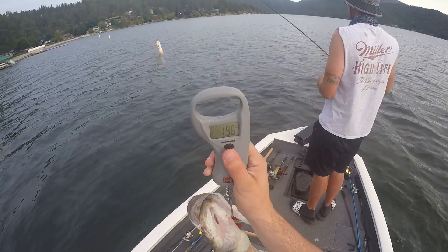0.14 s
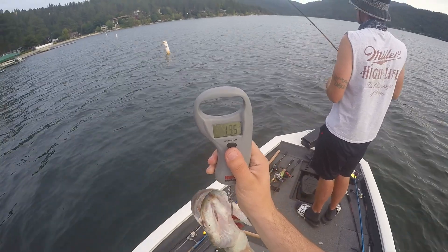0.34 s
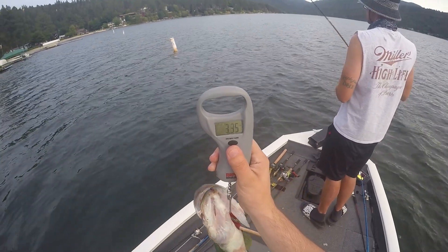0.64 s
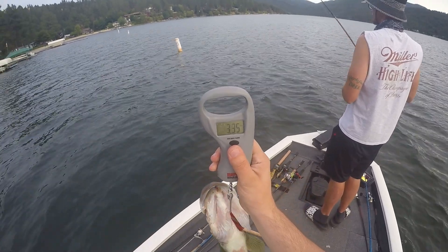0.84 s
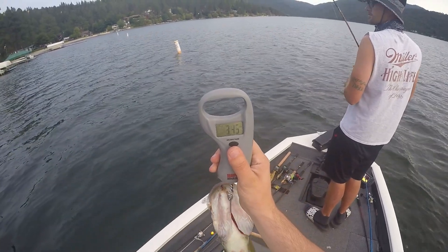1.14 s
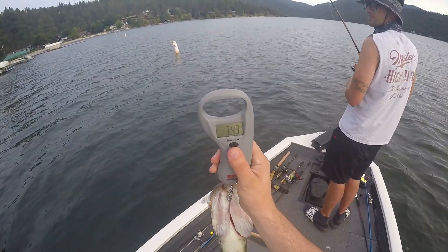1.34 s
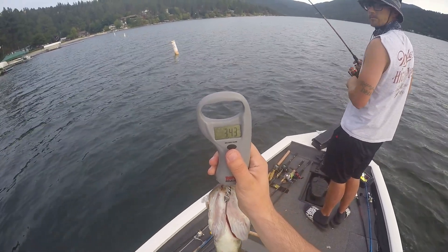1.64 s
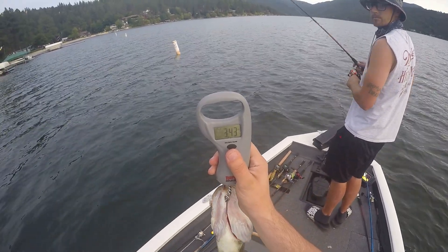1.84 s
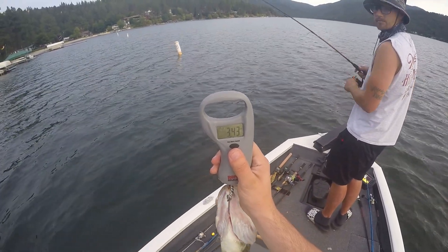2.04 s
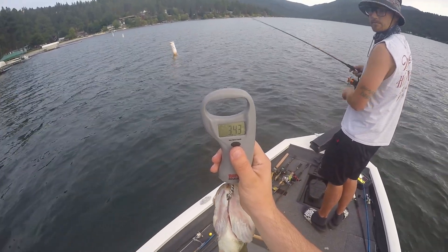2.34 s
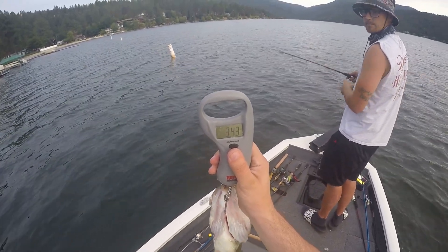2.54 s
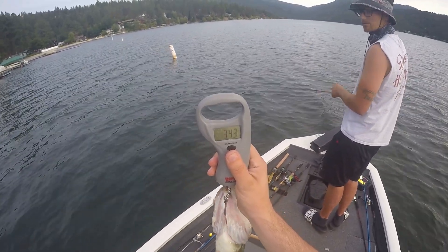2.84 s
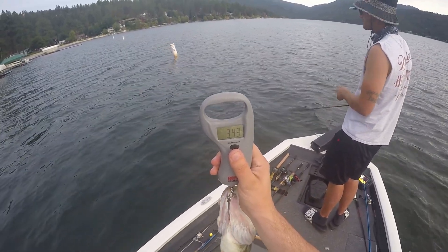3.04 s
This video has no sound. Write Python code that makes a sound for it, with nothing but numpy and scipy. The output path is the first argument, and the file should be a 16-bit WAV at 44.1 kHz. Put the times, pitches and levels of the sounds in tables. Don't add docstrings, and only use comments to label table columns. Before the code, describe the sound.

Steady low motor drone through a boat's hollow shell on an open lake; clearest water knocks come around one second, wind gusts swell after two, with faint hiss and thin whine on a small close microphone.

```python
import sys
import numpy as np
from scipy import signal
from scipy.fft import rfft, irfft
from scipy.io import wavfile
from scipy.ndimage import uniform_filter1d

SR = 44100
rng = np.random.default_rng(int(sys.argv[2]) if len(sys.argv) > 2 else 0)


def ratio_of_db(decibels):
    return 10 ** (np.asarray(decibels, float) / 20)


def transcribe(u):
    v = np.clip(np.atleast_2d(u).T, -1, 1)
    q = np.round(v * 32767).astype(np.int16)
    wavfile.write(sys.argv[1], SR, q)


N = 141120

# start_s, firing_rate_hz, third_order_db, second_order_db, fourth_order_db
MOTOR_COURSE = [(0.0, 80.3, -54, -50, -72), (0.03, 80.7, -56, -49, -62), (0.41, 79.7, -51, -55, -61),
                (1.44, 81.4, -49, -49, -53), (1.71, 80.5, -53, -53, -61), (1.84, 80.6, -48, -47, -50),
                (2.06, 79.8, -55, -59, -63), (2.11, 79.3, -55, -44, -60), (2.42, 80.5, -52, -55, -55),
                (2.65, 80.4, -47, -51, -62), (2.72, 78.4, -59, -53, -54), (2.77, 77.6, -46, -54, -64),
                (2.95, 79.6, -55, -46, -56), (2.99, 77.6, -54, -68, -61), (3.02, 77.1, -49, -45, -51),
                (3.05, 75.3, -59, -46, -75), (3.08, 74.7, -48, -55, -63), (3.2, 75.4, -56, -44, -60)]
# multiple of the firing rate's base turn, level_db re third order
WEAK_ORDERS = [(2.5, -16), (5, -13.5), (6, -10.5), (9, -13)]
# pitch_hz, level_db per Hz
HULL_SPECTRUM = [(76, -10), (130, 0), (199, -3), (236, -1), (284, -5.5), (536, -6.5), (702, -4.5),
                 (955, -14), (1300, -32.5), (1690, -53), (2860, -120)]
# start_s, level_db
HULL_LOAD = [
    (0, 1.5),
    (.3, 0.2),
    (.6, -0.25),
    (1.1, 2),
    (1.4, -1.1),
    (1.8, -0.3),
    (2.1, 1.75),
    (2.6, 1.1),
    (2.75, -1.1),
    (3.2, -0.5),
]
# start_s, level_db
GUSTS = [(0.0, -43), (0.3, -36.5), (0.34, -53), (0.4, -36), (0.45, -51.5), (0.52, -40.5), (1.79, -40.5),
         (1.98, -34.5), (2.04, -43), (2.07, -42), (2.26, -29.5), (2.33, -38.5), (2.49, -43), (2.6, -33.5),
         (2.69, -43), (2.8, -33), (2.97, -40.5), (3.2, -45)]
# pitch_hz, level_db per Hz
WIND_SPECTRUM = [(7.1, -30), (12, -9.5), (38, 4), (58, -0.5), (124, -14.5), (140, -23), (180, -39),
                 (310, -120)]
# start_s, peak_db, pitch_hz, t60_s
PLOP_EVENTS = [(.058, -40, 1030, .05), (.155, -49, 1360, .03), (.255, -48, 1650, 0.032),
               (.328, -46, 1750, 0.038), (0.424, -52, 2370, .03), (.662, -47, 1150, 0.027),
               (.464, -30, 729, 0.067), (.497, -43.5, 2170, 0.026), (1.082, -30.5, 595, 0.069),
               (1.097, -22.5, 423, 0.038), (1.137, -42, 1370, .03), (1.203, -28.5, 873, 0.065),
               (1.205, -31.5, 610, 0.11), (1.205, -44, 1330, 0.024), (1.288, -29.5, 714.5, 0.074),
               (1.288, -46, 1360, 0.044), (1.53, -34.5, 692, 0.084), (2.03, -31.5, 730, 0.1),
               (2.845, -46, 1470, .04)]
# start_s, peak_db, centre_hz
SLAP_EVENTS = [(.02, -57, 1390), (.39, -63, 2400), (0.5, -68, 2400), (0.424, -43.5, 730),
               (0.627, -48.5, 770), (.857, -43.5, 730), (.958, -44.5, 736), (1.081, -44, 620),
               (1.205, -56, 1110), (1.645, -49, 680), (1.725, -57, 824), (2.145, -44, 700),
               (2.275, -51, 690), (2.369, -53.5, 1390), (2.58, -58, 1520), (2.845, -55.5, 1380)]
# pitch_hz, level_db per Hz
WASH_SPECTRUM = [(650, -18), (1100, -6.5), (1650, -7), (2020, -12.5), (2410, -13), (2910, -19),
                 (4400, -23.5), (5720, -62), (9680, -120)]
# start_s, level_db
CHOP_COURSE = [(0, 0.5), (.2, 0.1), (.7, -1.7), (1.1, -0.3), (1.7, -1.5), (2.2, -1), (2.55, 1.5),
               (2.7, -0.3), (2.86, -1), (3.0, -2.5), (3.2, -1.5)]
# pitch_hz, level_db per Hz
HISS_SPECTRUM = [(2400, -14), (4000, -8.5), (5000, -7), (5600, -7.5), (7100, -12.5), (12000, -16.5),
                 (13500, -15), (15600, -22)]
# pitch_hz, width_hz, level_db
PUMP_WHINE = [(4763, 81, -77), (5020, 220, -80.5), (9600, 190, -89.5)]
# pitch_hz, level_db rms
ELECTRIC_TONES = [(4764, -88), (5874, -97), (10250, -100), (10729, -101), (10789, -102), (11687, -102),
                  (12225, -101), (12647, -102), (12710, -103), (12770, -103), (13668, -99)]
# start_s, length_s
DULL_MOMENTS = [(1.705, .04), (1.853, .035), (2.2, .09), (2.705, 0.081)]

ORDER_WAVER_DB, ORDER_WAVER_HZ, SPEED_JITTER = 1.0, 3.0, .0015
HULL_DB, WASH_DB, HISS_DB = -48, -62.5, -69.5
DRONE_HZ, DRONE_WIDTH_HZ, DRONE_DB = 697.4, 112, -53
GUST_EVEN_S = .12
UPPER_RUMBLE_HZ, UPPER_FOLLOWS, UPPER_DB = 62, 0.28, 0.7
PLOP_RISE_S = 0.0036
SLAP_T60_S, SLAP_WIDTH, SLAP_RISE_S = .07, .45, .003
DROPS_PER_S, DROPS_DB, TICKS_PER_S, TICKS_DB = 200, -74, 30, -88.5
DULL_ABOVE_HZ, DULL_SHARE = 13400, .97


def rms_one(x):
    return x / np.sqrt(np.mean(x ** 2) + 1e-20)


def in_time(rows):
    start_s, *columns = np.transpose(rows)
    return [np.interp(np.arange(N) / SR, start_s, column) for column in columns]


def drift(rate_hz):
    r = np.exp(-80 * np.pi * rate_hz / SR)
    noise = rng.standard_normal(N // 40 + 2002)
    slow = signal.lfilter([1], [1, -2 * r, r * r], noise)[2000:]
    return np.interp(np.arange(N) / 40, np.arange(len(slow)), rms_one(slow - slow.mean()))


def resonate(x, hz, width_hz):
    r = np.exp(-np.pi * width_hz / SR)
    poles = [1, -2 * r * np.cos(2 * np.pi * hz / SR), r * r]
    return signal.lfilter([(1 - r * r) / 2, 0, (r * r - 1) / 2], poles, x + 1e-18)


def coloured(spectrum, shared_db, own_db, flicker_hz):
    hz, db = np.transpose(spectrum)
    octave = np.log2(np.maximum(np.fft.rfftfreq(N, 1 / SR), 1))
    gain_db = np.interp(octave, np.log2(hz), db, left=-200, right=-200)
    shape = rfft(rng.standard_normal(N)) * ratio_of_db(gain_db)
    together, out = drift(flicker_hz), 0
    for centre in np.arange(np.log2(hz[0]) - .5, np.log2(hz[-1]) + .5, .5):
        band = irfft(shape * np.clip(1 - 2 * np.abs(octave - centre), 0, 1), N)
        out = out + band * ratio_of_db(shared_db * together + own_db * drift(flicker_hz))
    return rms_one(out)


def clicks(per_s, spread_db):
    sizes = ratio_of_db(spread_db * np.minimum(rng.exponential(1, N), 3)) * rng.choice([-1, 1], N)
    return sizes * (rng.random(N) < per_s / SR)


def motor():
    rate_hz, third_db, second_db, fourth_db = in_time(MOTOR_COURSE)
    phase = 2 * np.pi * np.cumsum(rate_hz * (1 + SPEED_JITTER * drift(6.6))) / SR
    orders = [(2, second_db), (3, third_db), (4, fourth_db)]
    orders += [(multiple, third_db + db) for multiple, db in WEAK_ORDERS]
    out = np.zeros(N)
    for multiple, db in orders:
        level = np.sqrt(2) * ratio_of_db(db + ORDER_WAVER_DB * drift(ORDER_WAVER_HZ))
        out += level * np.sin(round(2 * multiple) / 2 * phase + 2 * np.pi * rng.random())
    return out


def hull():
    load_db, = in_time(HULL_LOAD)
    lapping = rng.standard_normal(N) * ratio_of_db(1.04 * drift(19))
    hollow = resonate(lapping, DRONE_HZ, 6.4 * DRONE_WIDTH_HZ)
    hollow = rms_one(resonate(hollow, DRONE_HZ, DRONE_WIDTH_HZ))
    shell = coloured(HULL_SPECTRUM, .8, 1.17, 11.7)
    return ratio_of_db(load_db) * (ratio_of_db(HULL_DB) * shell + ratio_of_db(DRONE_DB) * hollow)


def wind():
    rumble = coloured(WIND_SPECTRUM, 0.18, 0.59, 5)
    span = int(GUST_EVEN_S * SR)
    power = uniform_filter1d(uniform_filter1d(rumble ** 2, size=span), size=span)
    even = rms_one(rumble / np.sqrt(power))
    low = signal.sosfiltfilt(signal.butter(2, UPPER_RUMBLE_HZ, fs=SR, output="sos"), even)
    gust_db, = in_time(GUSTS)
    mean_db = gust_db.mean()
    upper_db = mean_db + UPPER_DB + UPPER_FOLLOWS * (gust_db - mean_db)
    return ratio_of_db(gust_db + 0.74) * low + ratio_of_db(upper_db) * (even - low)


def plops():
    out = np.zeros(N)
    for start_s, peak_db, hz, t60_s in PLOP_EVENTS:
        t = np.maximum(np.arange(N) / SR - start_s, 0)
        envelope = ratio_of_db(peak_db - 60 * t / t60_s) * (1 - np.exp(-t / PLOP_RISE_S))
        out += envelope * np.sin(2 * np.pi * hz * t)
    return out


def slaps():
    noise, out = rng.standard_normal(N), np.zeros(N)
    for start_s, peak_db, hz in SLAP_EVENTS:
        t = np.maximum(np.arange(N) / SR - start_s, 0)
        puff = noise * ratio_of_db(peak_db - 60 * t / SLAP_T60_S) * (1 - np.exp(-t / SLAP_RISE_S))
        ring = resonate(resonate(puff, hz, SLAP_WIDTH * hz), hz, SLAP_WIDTH * hz)
        out += ring * np.sqrt(SR / hz) * 2
    return out


def water():
    drops = clicks(DROPS_PER_S, 2.0)
    pitch_index = rng.integers(0, 12, N)
    rings = sum(resonate(drops * (pitch_index == k), hz, hz / 20)
                for k, hz in enumerate(np.geomspace(900, 2600, 12)))
    ticks = resonate(clicks(TICKS_PER_S, 2.5), 11000, 8000)
    wash = ratio_of_db(WASH_DB) * coloured(WASH_SPECTRUM, .7, 0.23, 23) + ratio_of_db(DROPS_DB) * rms_one(rings)
    chop_db, = in_time(CHOP_COURSE)
    return ratio_of_db(chop_db) * wash + ratio_of_db(TICKS_DB) * rms_one(ticks)


def electrics():
    t = np.arange(N) / SR
    out = ratio_of_db(HISS_DB) * coloured(HISS_SPECTRUM, 0.69, 0.15, 25)
    for hz, width_hz, db in PUMP_WHINE:
        breath = resonate(rng.standard_normal(N), hz, 3.0 * width_hz)
        out += ratio_of_db(db) * rms_one(resonate(breath, hz, width_hz))
    for hz, db in ELECTRIC_TONES:
        out += np.sqrt(2) * ratio_of_db(db) * np.sin(2 * np.pi * hz * t)
    return out


def scene():
    return (motor() + hull() + wind() + plops() + slaps() + water() + electrics())[None]


def low_pass(x):
    return signal.sosfilt(signal.butter(12, 15170, fs=SR, output="sos"), x)


def record(dry):
    t = np.arange(N) / SR
    dull = sum(1. * (t > start_s) * (t < start_s + length_s) for start_s, length_s in DULL_MOMENTS)
    dull = uniform_filter1d(dull, size=300)
    top = signal.sosfiltfilt(signal.butter(6, DULL_ABOVE_HZ, "high", fs=SR, output="sos"), dry)
    return low_pass(dry - DULL_SHARE * dull * top)


dry = scene()
out = record(dry)
transcribe(out)
```